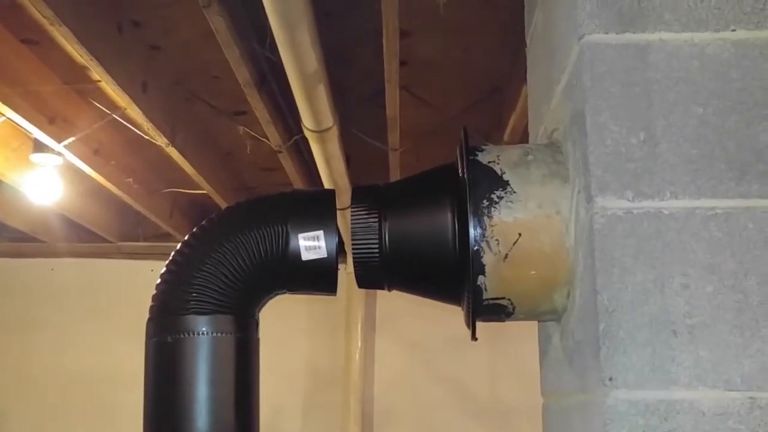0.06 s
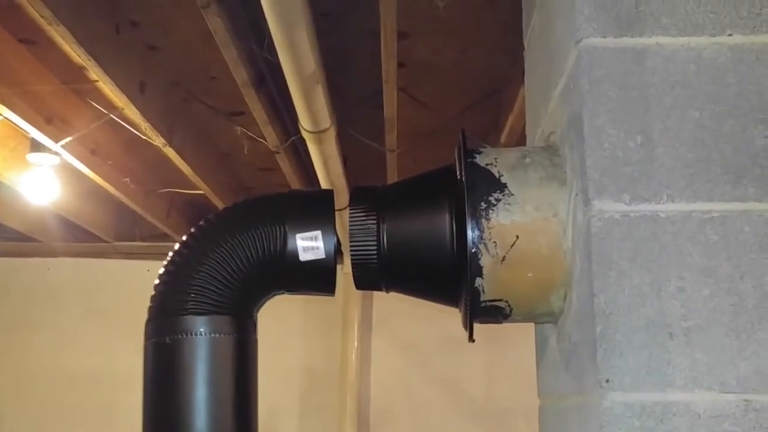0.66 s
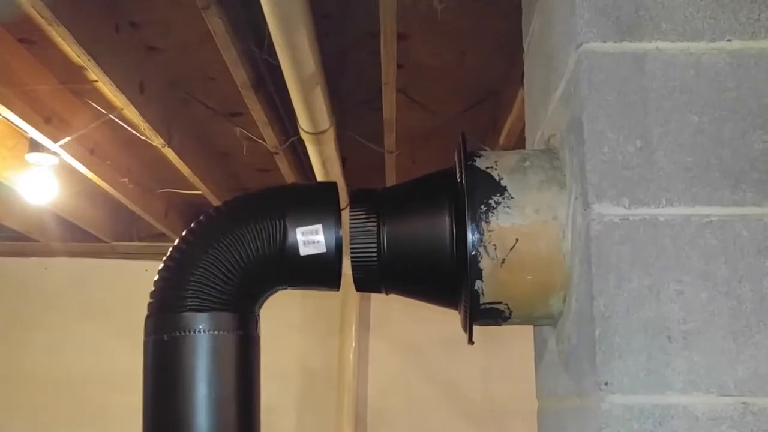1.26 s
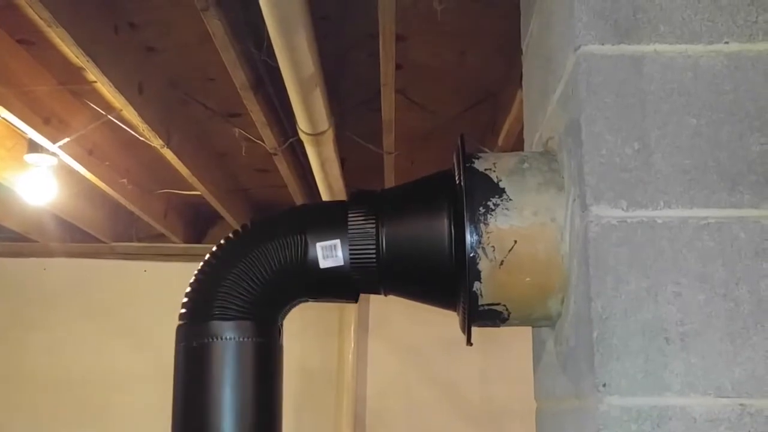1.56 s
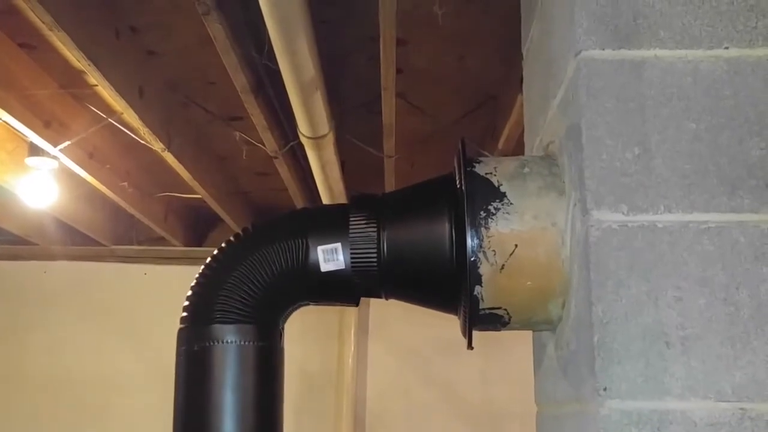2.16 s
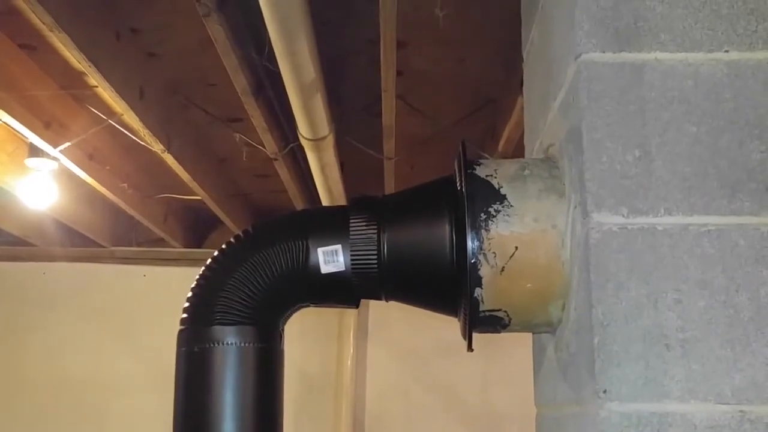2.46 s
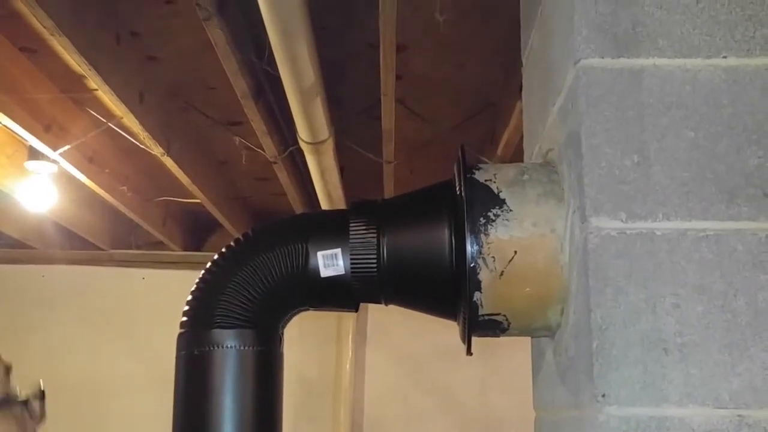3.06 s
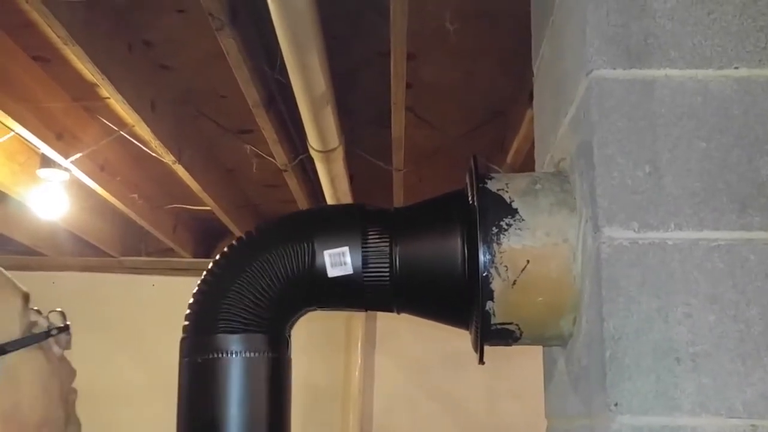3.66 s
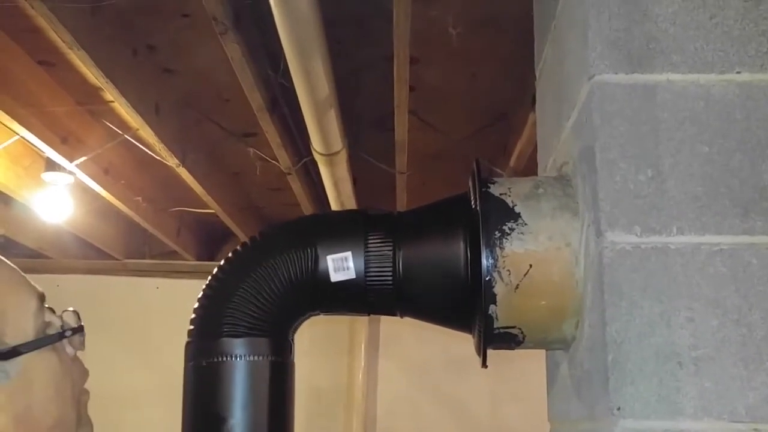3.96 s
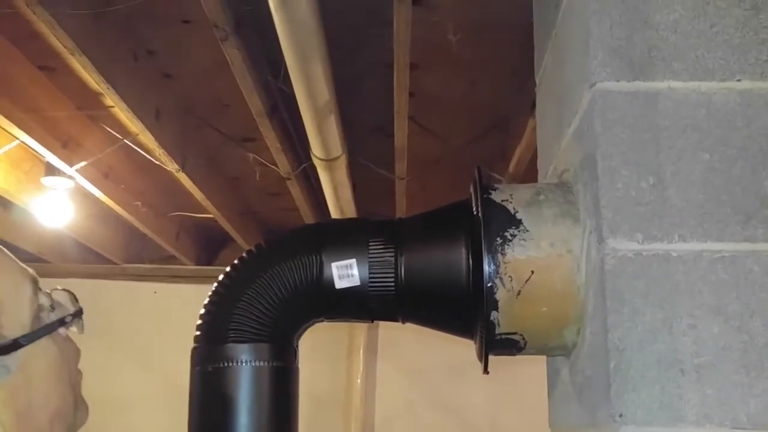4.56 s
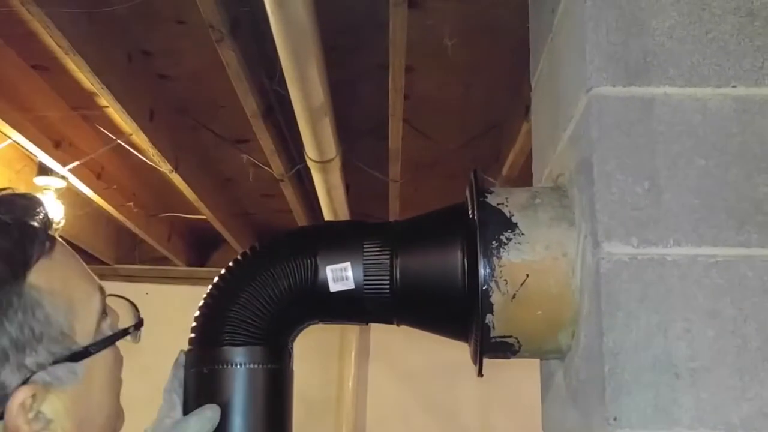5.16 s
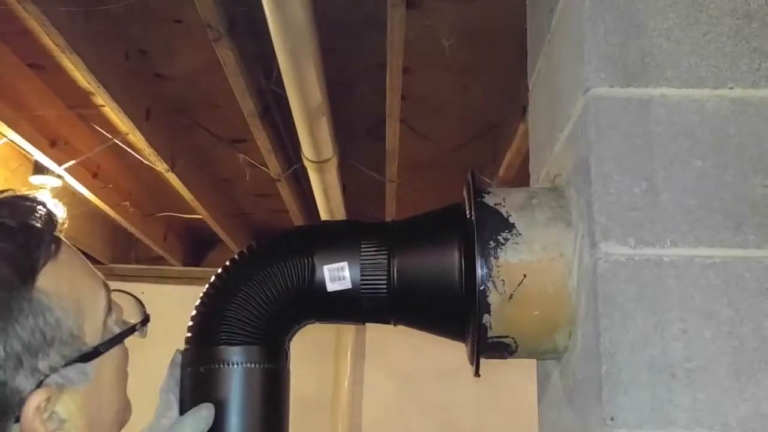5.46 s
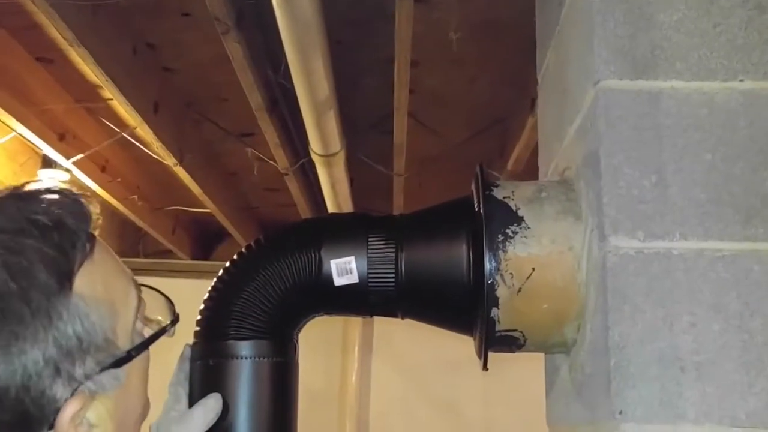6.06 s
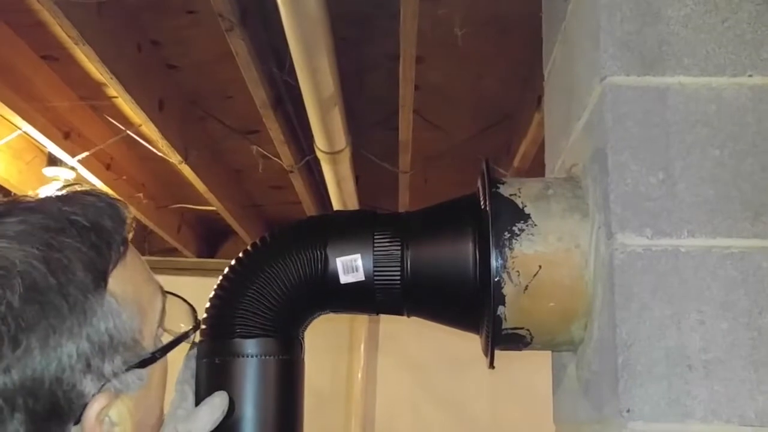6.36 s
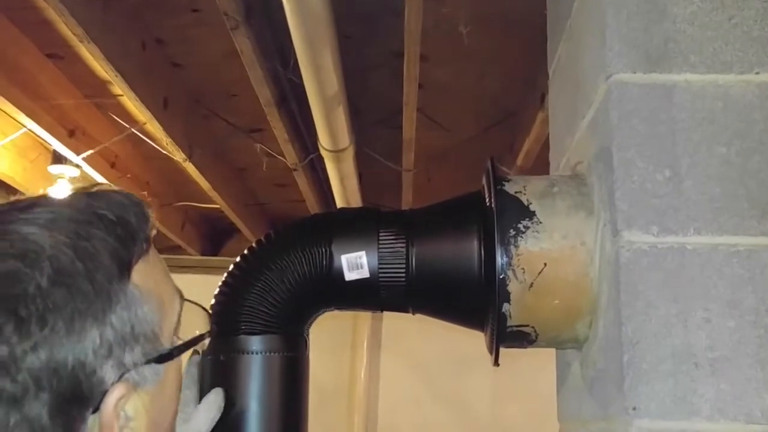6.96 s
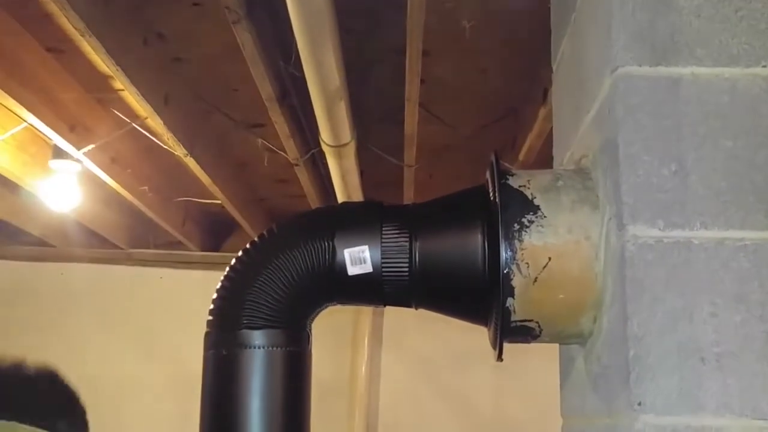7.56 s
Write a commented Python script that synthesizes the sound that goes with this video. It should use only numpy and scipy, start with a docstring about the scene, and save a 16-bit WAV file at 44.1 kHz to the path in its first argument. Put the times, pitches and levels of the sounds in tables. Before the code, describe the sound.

A sheet-metal pipe scrapes onto a metal fitting, catches in a run of ringing clanks, then is knocked into place.

```python
"""In a basement, a sheet-metal stove pipe elbow is worked onto the crimped collar of a wall fitting.
Stick-slip friction makes the rims scrape and judder; they catch in a run of clanks, then a few sharp
knocks shove the pipe home. Each contact excites the damped modes of the same thin steel shell, and
the seated pipe drives the fitting too. Clothing rustles over a faint hiss and rumble."""
import sys
import numpy as np
from scipy import signal
from scipy.fft import rfft, irfft, next_fast_len
from scipy.io import wavfile
from scipy.ndimage import uniform_filter1d

SR = 44100
rng = np.random.default_rng(int(sys.argv[2]) if len(sys.argv) > 2 else 0)


def store_wav(level_fs):
    """Save 16-bit WAV to argv[1]."""
    pcm = np.round(np.clip(np.atleast_2d(level_fs), -1, 1) * 32767)
    wavfile.write(sys.argv[1], SR, pcm.T.astype(np.int16))


N = 345303
TIME = np.arange(N) / SR
CATCH_S, SEATED_S = 1.412, 4.9   # the rim catches on the crimps; the pipe sits tight


# Distinct modes of the pipe: (frequency [Hz], energy [dB], decay time T60 [s])
PIPE_RESONANCES = [(102.9, -10, 1.1), (160.3, -8.5, 1.1), (178.5, -12, 0.091), (255.5, -13.5, 1.2),
                   (387, -11.5, 1.1), (714, -8.5, .7), (775, -7.5, 0.87), (808, -14, 1.2), (865, -9, .8),
                   (1194, -13, 0.53), (1255, -21, 0.87), (1750, -27.5, 0.55), (2424, -17, 0.18),
                   (7150, -19.5, 0.12), (10120, -8.5, .15)]
# Dense, overlapping shell and room modes: (frequency [Hz], spectral level [dB])
DENSE_SPECTRUM = [(42, 0.5), (110, -4), (270, 0), (420, -1.5), (740, 7.5), (1200, -4), (1900, -8),
                  (3000, -10.5), (5500, -9.5), (7900, -7.5), (9200, -13), (10400, -10.5), (12800, -15.5),
                  (16000, -26.5)]
# Ring of those dense modes: (frequency [Hz], decay time T60 [s])
DENSE_T60 = [(60, 0.73), (200, 0.77), (800, 1.09), (3000, 0.85), (7500, 0.49), (14000, .36)]
# Clusters of lightly damped modes: (frequency [Hz], spectral level [dB])
LINGER_SPECTRUM = [(70, -1), (150, 5), (400, 8), (520, -11.5), (800, -4), (1300, -3.5), (1900, -1),
                   (2450, -2.5), (2900, -20.5), (3500, 4.5), (4200, -13.5), (7000, -17.5), (16000, -45.5)]
def pipe_response(flash_t60, flash_db, linger_t60, linger_db, dense_db):
    """Modal superposition: a tap rings distinct modes as damped sines, dense ones as decaying noise."""
    t = TIME[:2 * SR]
    hz = np.fft.rfftfreq(len(t), 1 / SR)
    dense, spectrum = 0, rfft(diffuse(DENSE_SPECTRUM, len(t)))
    centres = np.geomspace(60, 15000, num=9)
    for centre, share in zip(centres, np.eye(len(centres))):
        part = irfft(spectrum * at_hz(np.column_stack([centres, share]), hz), len(t))
        ring = from_db(-60 * t / at_hz(DENSE_T60, centre))
        flash = from_db(flash_db - 60 * t / flash_t60)   # fast early decay
        dense = dense + part * unit_energy(ring + flash)
    linger = unit_energy(diffuse(LINGER_SPECTRUM, len(t)) * from_db(-60 * t / linger_t60))
    modes = 0
    for mode_hz, db, t60 in PIPE_RESONANCES:
        mode = unit_energy(np.sin(2 * np.pi * mode_hz * t) * from_db(-60 * t / t60))
        modes = modes + rng.choice([-1, 1]) * from_db(db) * mode
    return from_db(dense_db) * (unit_energy(dense) + from_db(linger_db) * linger) + modes


def shell(forces):
    """Shorter contacts excite higher modes: the three forces drive bass, middle and treble in turn."""
    response = pipe_response(flash_t60=0.043, flash_db=3, linger_t60=1.9, linger_db=-21, dense_db=10)
    low = band(band(response, "lowpass", 322, order=4), "highpass", 44, order=6)
    middle = band(band(response, "highpass", 508, order=3), "lowpass", 2160)
    high = band(response, "highpass", 1600)
    return sum(signal.fftconvolve(force[None], unit_energy(part), axes=1)[:, :N]
               for force, part in zip(forces, (low, middle, high)))


def pipe(forces, spots=3):
    """The response depends on the driving point, which wanders among spots on the rim."""
    nearness = from_db([12 * drift(per_s=9) for _ in range(spots)])
    shares = nearness / np.sqrt(np.sum(nearness ** 2, axis=0))
    return sum(shell(forces * share) for share in shares)


# Blows of rim on collar, relative levels: (time [s], clang [dB], thud [dB], boom [dB], buzz [dB])
RIM_BLOWS = [(1.394, -14, -21.5, -33.5, -45), (1.411, -3, -19, -29.5, -27.5), (1.5, -6.5, -25.5, -38, -26),
             (1.52, -10.5, -27, -29, -35), (1.624, -8.5, -23.5, -29.5, -39),
             (1.703, -10.5, -26.5, -33, -34.5), (1.869, -12, -30.5, -41, -36.5),
             (1.89, -19, -32, -43.5, -51), (1.954, -19, -36, -40, -59), (2.191, -23, -42, -52, -46.5),
             (3.554, -3.5, -16, -26.5, -9.5), (4.055, -13.5, -28, -35, -31.5),
             (4.957, -12.5, -37.5, -62.5, -22), (5.536, -32, -43.5, -46, -54),
             (5.557, -30, -43.5, -52, -65), (5.72, -27.5, -38.5, -45.5, -37),
             (6.107, -25.5, -35, -51, -47.5), (6.132, -36, -38, -55.5, -69)]
def knocks(thud_db, boom_db, clang_db, buzz_db):
    """Impulsive forces: a blow pushes the wall, sways the pipe, taps the rim and rattles the seam."""
    thud, boom, clang, buzz = np.zeros((4, N))
    for start, clang_level, thud_level, boom_level, buzz_level in RIM_BLOWS:
        at = round(start * SR)
        # the loose seam chatters longer the harder it is shaken
        burst = chatter(decay_s=.0022 * (1 + 5.3 * from_db(buzz_level)))
        thud[at] += from_db(thud_level + thud_db)
        boom[at] += from_db(boom_level + boom_db)
        clang[at] += from_db(clang_level + clang_db)
        buzz[at:at + len(burst)] += from_db(buzz_level + buzz_db) * burst
    push = band(thud, "highpass", 225, order=4) + band(boom, "lowpass", 190, order=4)
    return np.array([push, clang, buzz])


def chatter(decay_s):
    """Tiny contacts swell and die; a flat spectrum lets them excite all modes evenly."""
    age = TIME[:SR // 4] / max(decay_s, .001)
    burst = rng.standard_normal(len(age)) * (0.06 + age) * np.exp(-age)
    whitened = irfft(np.exp(1j * np.angle(rfft(burst))))
    return unit_energy(whitened[:SR // 10])


# Modes of the dent around a contact: (frequency [Hz], relative level [dB], decay time T60 [s])
DENT_MODES = [(885, 1.5, 0.012), (1284, -8.5, .012), (1685, -9, 0.02), (2120, -15, 0.006),
              (8500, -18.5, 0.013)]
def snaps(snap_db, hardening, detune, rise_s):
    """Direct radiation from the struck dent: stronger in hard blows, tuned differently at each spot."""
    out, t = np.zeros(N), TIME[:SR // 20]
    spots = rng.standard_normal((len(RIM_BLOWS), len(DENT_MODES)))
    for (start, level, *_), spot in zip(RIM_BLOWS, spots):
        at = round(start * SR)
        ring = sum(np.sin(2 * np.pi * hz * (1 + detune * shift) * t) * from_db(db - 60 * t / t60)
                   for (hz, db, t60), shift in zip(DENT_MODES, spot))
        out[at:at + len(t)] -= from_db(hardening * level + snap_db) * ring * (1 - np.exp(-t / rise_s))
    return out


# Bumps of the shifting pipe, relative levels: (time [s], thump [dB], hollow clunk [dB])
SOFT_BUMPS = [(.309, -31.5, -42.5), (.335, -24, -45), (.374, -25, -45), (.654, -24.5, -47),
              (.734, -22, -28.5), (.771, -23.5, -34), (1.138, -21, -29.5), (1.194, -27, -28),
              (3.221, -44.5, -56.5), (3.48, -49.5, -62), (4.78, -46, -52.5)]
def bumps(thump_db, clunk_db, contact_s):
    """Soft impact: the rim rolls into contact and drives only the bass and middle."""
    forces = np.zeros((3, N))
    for start, thump_level, clunk_level in SOFT_BUMPS:
        at, roll = round(start * SR), chatter(contact_s)
        forces[0, at] += from_db(thump_level + thump_db)
        forces[1, at:at + len(roll)] += from_db(clunk_level + clunk_db) * roll
    return forces


# Pushes along the collar, relative levels: (start [s], duration [s], rasp [dB], shudder [dB])
SLIDING_STROKES = [(0, 0.34, -48, -53.5), (0.306, .13, -55, -42.5), (0.457, 0.31, -30, -37.5),
                   (0.792, 0.062, -27.5, -32), (1.089, .36, -25.5, -29), (2.404, .03, -41.5, -54.5),
                   (2.86, 0.1, -47.5, -57.5), (3.02, .30, -58.5, -56.5), (4.488, .43, -54.5, -55),
                   (4.615, .05, -49, -67), (4.742, 0.05, -57.5, -58), (5.491, .05, -52, -41.5),
                   (6.071, 0.042, -60, -38.5), (6.45, .025, -54.5, -69)]
def sliding(judder_db, rasp_db, surge_db, full_screech_db):
    """Stick-slip friction: the pipe judders, crimps grind past the rim and a fine rasp surges."""
    rattle = after_catch(rise_s=0.042, fade_db_per_s=25.5)
    levels = np.outer(from_db([-24, -23.5, -45]), rattle)   # judder, grind, rasp
    for start, length, rasp_level, shudder_level in SLIDING_STROKES:
        strengths = from_db([shudder_level + judder_db, shudder_level, rasp_level + rasp_db])
        levels += np.outer(strengths, gesture(start, length, rise_s=0.023, fall_s=0.014, swell_db=8.5))
    judder = slips(per_s=400, spread_db=0)
    grind = slips(per_s=280, spread_db=4)
    grit = slips(per_s=900, spread_db=4.5)
    pressure = np.minimum(levels[2] / from_db(full_screech_db), 1)
    surge = from_db(surge_db * drift(per_s=37))
    whine = from_db(-14.5) * pressure * screech(centre_hz=8070, half_width_hz=170, wander=0.11)
    return levels * [judder, grind, surge * (grit + whine)]


def slips(per_s, spread_db):
    """A Poisson process: each slip is an independent impulse of random sign."""
    sizes = from_db(spread_db * np.minimum(rng.exponential(1, N), 3)) * rng.choice([-1, 1], N)
    return rms_one(sizes * (rng.random(N) < per_s / SR))


def screech(centre_hz, half_width_hz, wander):
    """Friction concentrates its energy in a narrow, wandering band."""
    pitch = centre_hz * (1 + wander * drift(per_s=16))
    amplitude = band(rng.standard_normal(N), "lowpass", half_width_hz)
    return rms_one(amplitude * np.sin(2 * np.pi * np.cumsum(pitch) / SR))


# Steel forced over the crimps: (time [s], frequency [Hz], level [dB], half duration [s])
CRIMP_SQUEALS = [(1.413, 7900, -31.5, 0.014), (3.569, 7140, -28, 0.012), (3.576, 10250, -17.5, .006),
                 (4.967, 8050, -14.5, 0.0014)]
def squeals(waver):
    """Friction-induced oscillation: very short tones of unsteady pitch."""
    out, t = np.zeros(N), np.arange(-SR // 40, SR // 40) / SR
    for peak_s, hz, db, half_s in CRIMP_SQUEALS:
        jitter = rms_one(uniform_filter1d(rng.standard_normal(len(t)), size=60))
        pitch = hz * (1 + waver * jitter)
        envelope = from_db(db) * np.exp(-(t / half_s) ** 2)
        at = round((peak_s + t[0]) * SR)
        out[at:at + len(t)] += envelope * np.sin(2 * np.pi * np.cumsum(pitch) / SR)
    return out


def gripped(forces, edge_hz):
    """Clamping suppresses sway: once the pipe is seated, its pushes lose their deep bass."""
    push = np.where(TIME > SEATED_S, band(forces[0], "highpass", edge_hz), forces[0])
    return np.array([push, forces[1], forces[2]])


# Resonances fed by the rattle: (frequency [Hz], bandwidth [Hz], relative level [dB])
SINGING_BANDS = [(104, 9.4, -5.5), (159, 8.3, -4), (234, 9, -9.5), (333, 9.4, -10), (394, 25, -7.5),
                 (800, 230, -11), (1300, 110, -9.5), (1760, 40, -19), (2300, 260, -8.5), (3370, 440, -7.5),
                 (4740, 120, -17.5)]
def singing(level_db):
    """Lightly damped resonances store the rattle's energy and release it slowly, the high ones faster."""
    out = 0
    for hz, width_hz, db in SINGING_BANDS:
        edges_hz = [hz - width_hz / 2, hz + width_hz / 2]
        mid, side = rms_one(band(rng.standard_normal((2, N)), "bandpass", edges_hz))
        alike = np.clip(at_hz(COHERENCE, hz), 0, 1)
        pair = np.sqrt((1 + alike) / 2) * mid + np.sqrt((1 - alike) / 2) * side * [[1], [-1]]
        envelope = after_catch(rise_s=.4, fade_db_per_s=10.5 * (hz / 1000) ** 0.088)
        out = out + from_db(db) * pair * envelope
    return from_db(level_db) * out


# Tinny ring of the wall fitting: (frequency [Hz], spectral level [dB])
FITTING_SPECTRUM = [(170, -31), (215, 0.5), (260, 3), (320, 9), (450, -7.5), (640, 17.5), (760, -19),
                    (890, 8.5), (1200, -14), (1600, -12), (2300, 1.5), (2800, -26.5), (3450, -2),
                    (4200, -4), (5000, -20), (7000, -25), (8200, -7), (9200, -49.5)]
def fitting(forces, tap_db, buzz_db, t60):
    """Mechanical coupling: the seated pipe passes its taps and buzz on to the wall fitting."""
    drive = (from_db(tap_db) * forces[1] + from_db(buzz_db) * forces[2]) * (TIME > SEATED_S)
    response = unit_energy(diffuse(FITTING_SPECTRUM, SR) * from_db(-60 * TIME[:SR] / t60))
    return signal.fftconvolve(drive[None], response, axes=1)[:, :N]


# Clothing brushing as the arms shift: (start [s], duration [s], level [dB])
CLOTH_RUSTLES = [(0, 0.81, -56.5), (2.004, 1.3, -57.5), (5.7, 0.93, -63.5), (7.105, 0.27, -64.5),
                 (7.372, 0.43, -58.5)]
# Rumble of the room: (frequency [Hz], spectral level [dB])
RUMBLE_SPECTRUM = [(30, -25.5), (55, 7.5), (110, -1), (260, -1), (420, -13), (750, -4), (1500, -20.5),
                   (4000, -41.5), (16000, -54.5)]
# Hiss of room and clothing: (frequency [Hz], spectral level [dB])
HISS_SPECTRUM = [(100, -8), (700, 5.5), (1600, -3.5), (3000, -4.5), (7500, -6.5), (11000, -9.5),
                 (15500, -10)]
def basement(rumble_db, hiss_db):
    """Incoherent noises add in power: rustling clothes swell the hiss above a steady rumble."""
    rustle = sum(from_db(db) * gesture(start, length, rise_s=0.056, fall_s=.08)
                 for start, length, db in CLOTH_RUSTLES)
    rumble = from_db(rumble_db) * diffuse(RUMBLE_SPECTRUM, N)
    return rumble + np.hypot(from_db(hiss_db), rustle) * diffuse(HISS_SPECTRUM, N)


# Likeness of left and right: (frequency [Hz], correlation [0 to 1])
COHERENCE = [(100, 1), (300, 0.96), (600, .8), (1100, 0.43), (2200, 0.2), (4500, 0.057), (14000, 0.2)]
def diffuse(spectrum, size):
    """A diffuse field: stereo noise, coherent in the bass and nearly unrelated in the treble."""
    hz = np.fft.rfftfreq(size, 1 / SR)
    mid, side = np.exp(2j * np.pi * rng.random((2, len(hz))))
    alike = np.clip(at_hz(COHERENCE, hz), -1, 1)
    pair = np.sqrt(1 + alike) * mid + np.sqrt(1 - alike) * side * [[1], [-1]]
    return rms_one(irfft(pair * from_db(at_hz(spectrum, hz)), size))


def gesture(start, length, rise_s, fall_s, swell_db=0):
    """Envelope of a movement: linear attack, swell to its end, exponential release."""
    age = TIME - start
    swell = from_db(swell_db * (np.clip(age / length, 0, 1) - 1))
    return np.clip(age / rise_s, 0, 1) * swell * np.exp(-np.clip((age - length) / fall_s, 0, 20))


def after_catch(rise_s, fade_db_per_s):
    """Exponential damping of a motion that builds up when the rim catches."""
    age = np.maximum(TIME - CATCH_S, 0)
    return np.minimum(age / rise_s, 1) * from_db(-fade_db_per_s * age)


def drift(per_s):
    """Slow random modulation with a spread of about 1."""
    return np.interp(TIME * per_s, np.arange(1000), rng.standard_normal(1000))


def band(x, kind, edge_hz, order=2):
    """Causal Butterworth filter."""
    return signal.sosfilt(signal.butter(order, edge_hz, kind, fs=SR, output="sos"), x + 1e-18)


def at_hz(points, hz):
    """Interpolation on a log-frequency axis."""
    f, value = np.transpose(points)
    return np.interp(np.log(np.maximum(hz, 1)), np.log(f), value)


def from_db(db):
    return 10 ** (np.asarray(db) / 20)


def rms_one(x):
    return x / np.sqrt(np.mean(x ** 2) + 1e-20)


def unit_energy(x):
    return rms_one(x) / np.sqrt(x.shape[-1])


def scene():
    """Source and resonator: contact forces drive the steel; snaps and squeals also radiate directly."""
    forces = knocks(thud_db=33.5, boom_db=32.5, clang_db=21.5, buzz_db=27.5)
    forces += bumps(thump_db=25, clunk_db=28.5, contact_s=0.003)
    forces += sliding(judder_db=-1, rasp_db=-2.5, surge_db=3, full_screech_db=-28.5)
    forces = gripped(forces, edge_hz=61)
    squeal = squeals(waver=0.1)
    forces[2] += from_db(-18) * squeal
    snap = snaps(snap_db=4, hardening=1.2, detune=.05, rise_s=.0007)
    steel = pipe(forces) + singing(level_db=-40.5) + fitting(forces, tap_db=-10.5, buzz_db=1, t60=0.46)
    return steel + snap + squeal + basement(rumble_db=-64, hiss_db=-65.5)


# Treble shading of the microphone's right port: (frequency [Hz], left minus right [dB])
PORT_SHADING = [(1000, 0.47), (2600, -0.7), (4800, -1.5), (7500, 7.5), (10500, 12), (14000, -1.5)]
def microphone(x, hollow_hz, hollow_q, hollow_share, right_lag_s):
    """Frequency response: a notch hollows the low middle; the right port is shaded and lags."""
    notched = signal.lfilter(*signal.iirnotch(hollow_hz, hollow_q, SR), x)
    x = x + hollow_share * (notched - x)
    size = next_fast_len(N + 2000)
    hz = np.fft.rfftfreq(size, 1 / SR)
    side = np.array([[.5], [-.5]])
    shading = from_db(side * at_hz(PORT_SHADING, hz))
    lag = np.exp(2j * np.pi * np.minimum(hz, 5000) * side * right_lag_s)
    return irfft(rfft(x, size) * shading * lag, size)[:, :N]


def record(dry):
    """Microphone colour, soft saturation of the peaks, then a steep low-pass filter."""
    ceiling, cutoff_hz = .9, 15900
    heard = microphone(dry, hollow_hz=515.7, hollow_q=2, hollow_share=0.82, right_lag_s=.00003)
    heard = heard / (1 + (np.abs(heard) / ceiling) ** 6) ** (1 / 6)
    return signal.sosfilt(signal.ellip(12, .1, 80, cutoff_hz, fs=SR, output="sos"), heard)


dry = scene()
out = record(dry)
store_wav(out)
```